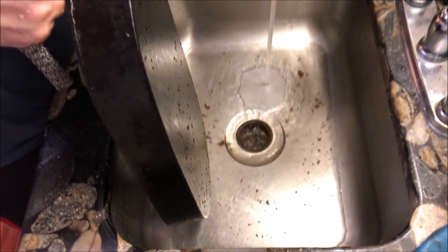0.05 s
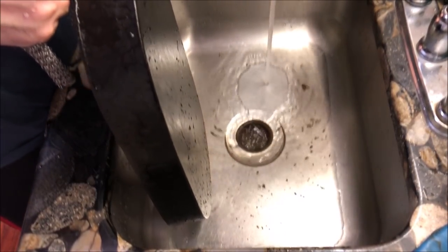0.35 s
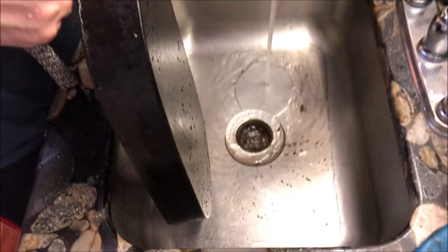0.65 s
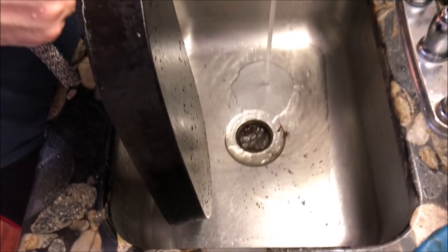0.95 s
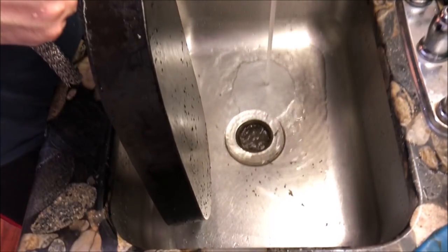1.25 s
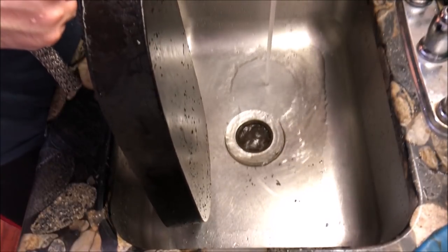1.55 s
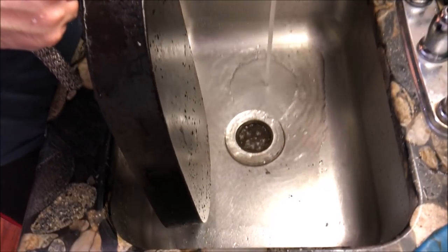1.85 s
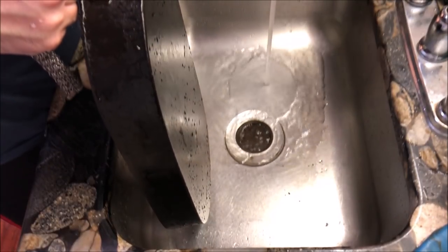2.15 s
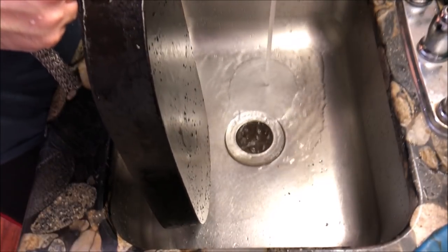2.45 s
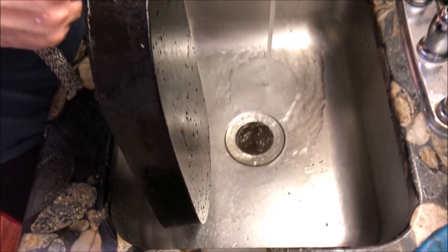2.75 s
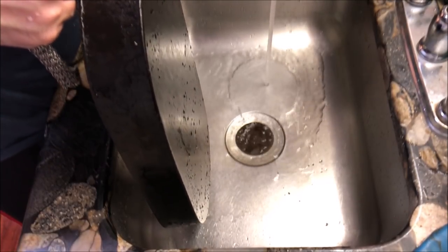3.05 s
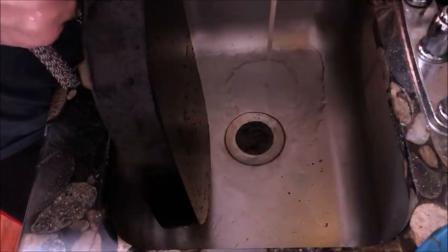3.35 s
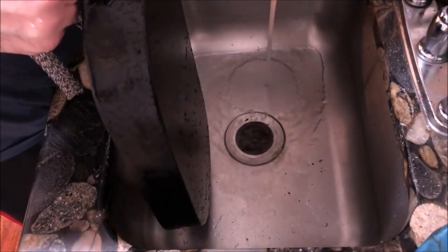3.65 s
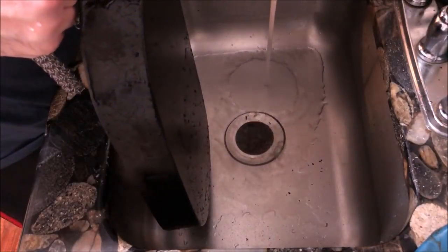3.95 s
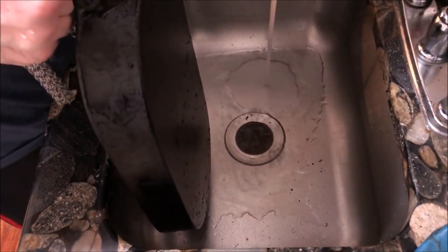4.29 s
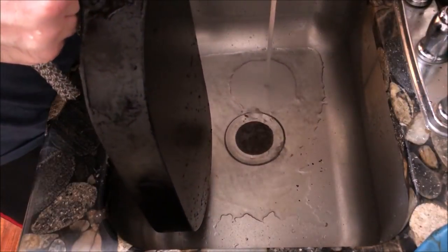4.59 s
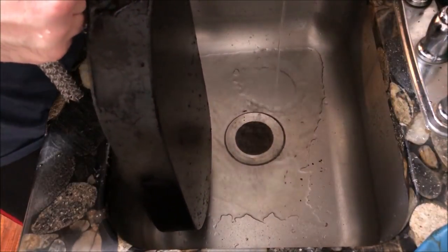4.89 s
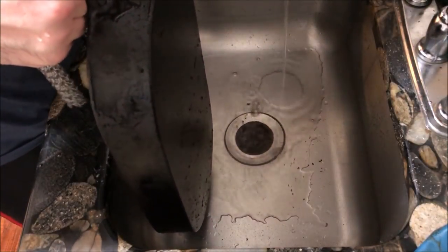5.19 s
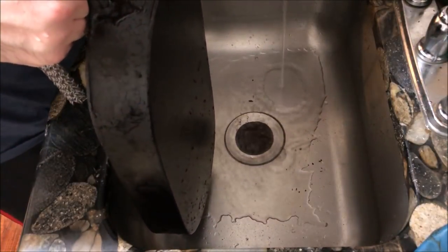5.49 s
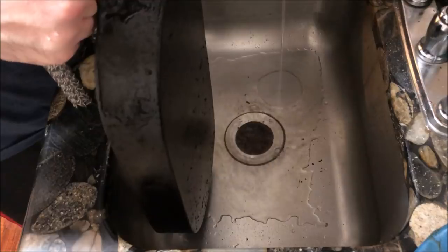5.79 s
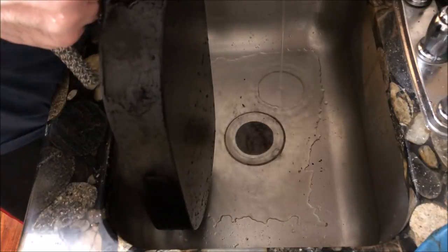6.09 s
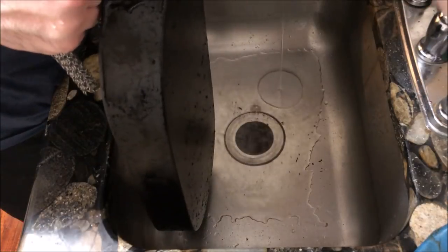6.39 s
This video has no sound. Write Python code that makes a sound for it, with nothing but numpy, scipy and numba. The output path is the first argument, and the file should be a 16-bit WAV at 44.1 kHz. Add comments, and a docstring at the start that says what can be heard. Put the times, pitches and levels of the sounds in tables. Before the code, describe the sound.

Tap water hisses into a steel sink over a low motor hum; the hum stops, then the water dwindles to a dribble and drips.

```python
"""A tap runs into a steel kitchen sink: the jet hisses and crackles with small bubbles, and a sheet
of water swishes across the basin. When the tap is closed, the last thread of water breaks into
drops that drum on the steel. Something bumps the sink twice. Behind the water, a mains motor hums
until it is switched off, a little before the tap closes."""
import sys
import numpy as np
from scipy import signal
from scipy.fft import rfft, irfft
from scipy.io import wavfile
from numba import njit

SR = 44100
rng = np.random.default_rng(int(sys.argv[2]) if len(sys.argv) > 2 else 0)


def persist_wave(psi):
    """Save psi, clipped to +-1, as 16-bit WAV."""
    counts = np.round(np.clip(psi, -1, 1) * 32767).astype(np.int16)
    wavfile.write(sys.argv[1], SR, np.atleast_2d(counts).T)


N = 283563
T = np.arange(N) / SR
# Levels in tables are relative. A "t60" is the time a sound takes to fade by 60 dB.

# The splashing sounds a little louder near the end.
JET_DB, LOUDER_DB, LOUDER_FROM_S, LOUDER_RISE_S = -38.5, 2.5, 3.68, 0.37
# The tone of the splashing jet: f/Hz, level/dB
JET_TONE = [(30, -33), (300, -6), (700, -15), (950, -18), (1100, -16), (2100, -14.5), (2900, -10),
            (3500, -12), (3950, -1.5), (5000, -8), (5900, -2.5), (7500, -7.5), (9800, -5.5), (12000, -3.5),
            (16000, -4)]
def jet(strength):
    """A fine hiss, the clicks of bursting foam and short bubble rings, all swelling with the splash."""
    hiss = level(rng.standard_normal(N), -22.5)
    clicks = level(impacts(1500, 12.6, 34), -1)
    fine = level(foam(count=4000, low_hz=5940, high_hz=18000, cycles=19.5, spread_db=3), 0)
    coarse = level(foam(count=2600, low_hz=2790, high_hz=8200, cycles=8, spread_db=11), -1.5)
    water = colour(hiss + clicks + fine + coarse, JET_TONE)
    flutter_db = 1.4 * wander(80)
    return level(water, 4.6) * strength * undb(flutter_db)


def foam(count, low_hz, high_hz, cycles, spread_db):
    """Many small bubbles, each with its own moment, pitch and loudness."""
    out = np.zeros(N)
    for when, pitch, size in rng.random((count, 3)):
        size_db = min(-spread_db * np.log(1 - size), 14)
        hz = low_hz * (high_hz / low_hz) ** pitch
        add(out, when * N / SR, undb(size_db) * bubble(hz, cycles))
    return out


def bubble(hz, cycles, rise=0.029):
    """A bubble rings for some cycles, rising in pitch as it nears the surface."""
    t60 = cycles / hz
    t = T[:int(t60 * SR) + 2]
    return np.sin(2 * np.pi * hz * t * (1 + rise * t / t60)) * fade(t, t60)


TAP_CLOSED_S, DRIBBLE_FROM_S, DRIBBLE_TO_S, DRIBBLE_BUILD_DB_PER_S = 4.915, 5.14, 5.76, 5.5
def flow():
    """Strength of the full jet and of the dribble that builds up after it, each from 0 to 1."""
    running = fade(np.maximum(T - TAP_CLOSED_S, 0), t60=0.32)
    build_db = DRIBBLE_BUILD_DB_PER_S * np.minimum(T - DRIBBLE_TO_S, 0)
    dribble = undb(build_db) * envelope(DRIBBLE_FROM_S, rise=0.031, stop=DRIBBLE_TO_S, t60=1)
    return running, dribble


# The loudest bubbles bursting under the jet: t/s, snap level/dB, ring level/dB, f/Hz
LOUD_POPS = [(0.8225, -15, -28, 4040), (1.2374, -17, -27, 5670), (1.3029, -10, -27, 8280),
             (1.716, -15, -29, 6100), (1.9704, -13, -26, 6120), (2.3351, -18, -28, 4040),
             (2.364, -16, -27, 4050), (3.0445, -14, -30, 5710), (3.6696, -16, -29, 4250),
             (3.9165, -16, -24, 5910), (4.0622, -11, -21, 6040), (4.3031, -14, -22, 5410),
             (4.3425, -12, -23, 4430), (4.5067, -11, -23, 6660), (4.6379, -8, -28, 8080),
             (4.7626, -12, -21, 5620), (4.8115, -13, -26, 8000), (4.8514, -12, -25, 6730),
             (4.9053, -9, -25, 5740), (4.9282, -9, -24, 5730)]
def pops(jet_db):
    """Larger bubbles burst where the jet lands, each with a ring, a little spray and a snap."""
    out = np.zeros(N)
    for s, snap_db, ring_db, hz in list(LOUD_POPS) + lesser_pops(jet_db, count=110):
        add(out, s, undb(ring_db + 12.5) * bubble(hz, cycles=18))
        add(out, s, undb(snap_db - 2) * burst(t60=0.0054))
        add(out, s, undb(snap_db) * bubble(12000, cycles=5))
    return colour(out, [(800, -28), (2300, -18), (3400, 0), (16000, 0)])


def lesser_pops(jet_db, count, from_s=0.71, low_hz=3540, high_hz=6080):
    """Once water covers the sink floor, mostly weak pops come at random until the tap is closed."""
    when, size, pitch = rng.random((count, 3)).T
    s = from_s + when * (TAP_CLOSED_S - from_s)
    snap_db = np.interp(s, T, jet_db) + 10 + 10 * size ** 2
    ring_db = snap_db - 8.5
    hz = low_hz * (high_hz / low_hz) ** pitch
    return list(zip(s, snap_db, ring_db, hz))


SPURT_HZ, SHEET_START_HZ, SHEET_HALF_PITCH_S = 10700, 13350, 0.18
# The spurts that start the sheet of water: t/s, level/dB
FIRST_SPURTS = [(0.021, -21), (0.087, -19)]
def swish():
    """Bright spurts, then a sheet of water fizzes over the steel, lower in pitch as it deepens."""
    spurts = sum(undb(db) * envelope(s, rise=0.013, stop=s + 0.011, t60=0.19) for s, db in FIRST_SPURTS)
    sheet = undb(-24.5) * envelope(0.09, rise=0.1, stop=0.19, t60=3.62)
    sheet_hz = SHEET_START_HZ / (1 + T / SHEET_HALF_PITCH_S)
    return spurts * fizz(np.full(N, float(SPURT_HZ))) + sheet * fizz(sheet_hz)


def fizz(hz):
    """Fine bubbles around one pitch; the commonest size stands out, and the steel favours some bands."""
    all_sizes = level(bandpass(impacts(8000, 3.4, 24), hz, 1.9) / np.sqrt(hz), 0)
    commonest = level(bandpass(impacts(9000, 3, 24), 0.87 * hz, 0.45) / np.sqrt(hz), -5)
    steel_tone = [(300, -13.5), (700, 8), (920, -9), (1100, -1), (1700, -2.5), (2500, 2),
                  (3400, -1.5), (4400, 3.5), (9000, -3), (16000, 2)]
    sound = colour(all_sizes + commonest, steel_tone)
    flutter_db = 1.1 * wander(40)
    return level(sound, 0) * undb(flutter_db)


# The tone of a drop spreading on steel: f/Hz, level/dB
SPLAT_TONE = [(400, -9), (750, -0.5), (920, -13.5), (1200, -4), (1450, -2), (2200, -5.5), (3500, -8.5),
              (7000, -22), (15000, -24)]
# The larger drops: t/s, tick level/dB, splat level/dB, trapped bubble f/Hz
LAST_DROPS = [(4.967, -38, -50, 1800), (5.162, -29, -43.5, 5250), (5.178, -25, -41, 6500),
              (5.217, -27, -38, 5650), (5.359, -38, -60, 6200), (5.444, -18, -36.5, 6800),
              (5.564, -26, -38, 6400), (5.591, -25, -28, 4300), (5.66, -42, -36, 4280),
              (5.678, -30, -33.5, 6400), (5.768, -41, -36, 5450), (6.118, -15, -68, 9000),
              (6.237, -32, -78, 9600), (6.259, -39, -80, 5120), (6.37, -32, -90, 7160)]
def drops():
    """Each drop ticks, spreads in a splat and pushes the sink floor; bigger splats thud harder."""
    ticks, splats, pushes = np.zeros((3, N))
    for s, tick_db, splat_db, _ in LAST_DROPS:
        add(ticks, s, undb(tick_db) * burst(t60=0.015))
        add(splats, s, undb(splat_db) * burst(t60=0.14))
        add(pushes, s, undb(-18.5 + 0.47 * splat_db) * fade(T[:256], t60=0.0021))
    ticks = colour(ticks, [(800, -36), (2500, -47), (5000, 1.5), (8000, 2.5), (16000, -1)])
    splashes = undb(-7) * ticks + undb(13.5) * colour(splats, SPLAT_TONE)
    thuds = undb(-23) * steel_ring(pushes)
    return splashes, thuds


# Lone bubbles in the draining water: t/s, level/dB, f/Hz
LONE_BUBBLES = [(5.256, -34.5, 5800), (5.811, -40, 5300)]
def plinks():
    """Bubbles ring longer in calm water than under the jet: each drop traps one, and a few ring alone."""
    trapped = [(s, -15.5 + 0.56 * tick_db, hz) for s, tick_db, _, hz in LAST_DROPS]
    out = np.zeros(N)
    for s, db, hz in trapped + list(LONE_BUBBLES):
        add(out, s, undb(db) * bubble(hz, cycles=90, rise=0.08))
    return out


def trickle(dribble):
    """The thin thread of water ticks faintly on the steel, and crackles while it dribbles."""
    crackle = level(colour(impacts(900, 3.7, 19), SPLAT_TONE), -53)
    tick_tone = [(800, 4), (3000, -3.5), (6000, -2), (16000, 0)]
    ticks = level(colour(impacts(200, 4, 11), tick_tone), -57.5)
    return crackle * dribble + ticks * (T > TAP_CLOSED_S)


def drumming(running, dribble):
    """The jet, the sheet of water and the dribble patter on the sink floor and keep it ringing low."""
    sheet = envelope(0, rise=0.19, stop=0.95, t60=1.6)
    force = np.maximum(undb(-43) * running, undb(-35) * sheet) + undb(-34) * dribble
    patter_tone = [(100, 11), (200, 9), (280, -16), (400, 5.5), (750, -7.5), (1300, -15), (2500, -9.5)]
    patter = colour(impacts(500, 3.9, 34), patter_tone)
    return undb(-3) * steel_ring(patter * force) / np.std(steel_ring(patter))


# The notes that the steel basin rings with: f/Hz, level/dB, t60/s
STEEL_NOTES = [(133, -30, .25), (173.2, -5.5, 0.25), (213.5, -4, 0.186), (279.7, 4, 0.21), (281.7, -5, 0.4),
               (309, -11, 0.39), (322.4, -10, 0.62), (389, -5.5, 0.45), (445, -9.5, 0.33),
               (473.4, -16, 0.42), (587, -10, 0.26), (630, -4.5, 0.12), (723, -16, 0.43), (790, -5.5, 0.1),
               (985, -10, 0.074), (1415, -3, 0.24), (1506, -12, 0.47), (1620, -26, .22),
               (2140, -12.5, 0.25)]
def steel_ring(push):
    """The basin answers a push with its own notes; its thin walls give off no deep bass."""
    t = T[:SR]
    notes = sum(undb(db) * np.cos(2 * np.pi * hz * t) * fade(t, t60) for hz, db, t60 in STEEL_NOTES)
    wall_tone = [(60, -16.5), (170, -5.5), (330, 3), (390, -22), (480, -2), (2000, -5.5), (5000, -9.5)]
    return colour(through(push, notes), wall_tone)


# Bands that the steel walls favour in every splash: f/Hz, width as a share of f, level/dB
WALL_BANDS = [(1069, 0.015, 6), (1500, 0.016, -22), (4130, 0.025, -36), (4280, 0.017, -21),
              (5560, 0.11, -6.5), (6650, 0.021, -43), (8220, 0.064, -3), (11500, 0.09, -9)]
def basin(x):
    """The walls ring and add quick echoes that change with the spot hit; the kitchen echoes faintly."""
    x = x + sum(undb(db) * bandpass(x, np.full(N, float(hz)), float(width))
                for hz, width, db in WALL_BANDS)
    out = undb(-3) * x
    blend = np.pi * wander(60)  # drifts between two sets of echoes
    for share in (np.cos(blend), np.sin(blend)):
        walls = burst(t60=0.046) * (T[:8192] > 0.0008)
        out = out + undb(-4.5) * through(x * share, walls / np.linalg.norm(walls))
    kitchen = burst(t60=0.11, size=16384) * (T[:16384] > 0.006)
    return out + undb(-12) * through(x, kitchen / np.linalg.norm(kitchen))


# The tones of two dull bumps (the first has three): t/s, f/Hz, level/dB, t60/s
BUMP_TONES = [(4.36, 682, -32, 0.093), (4.364, 300, -17, 0.027), (4.378, 117, -22, 0.11),
              (4.733, 137, -33.5, 0.18)]
def bumps():
    """Soft knocks against the sink that die away quickly."""
    out, t = np.zeros(N), T[:SR // 2]
    soft_start = 1 - fade(t, 0.018)
    for s, hz, db, t60 in BUMP_TONES:
        add(out, s, undb(db + 5.5) * np.sin(2 * np.pi * hz * t) * fade(t, t60) * soft_start)
    return out


HUM_HZ, MOTOR_OFF_S, RUMBLE_SETTLE_DB_PER_S = 120, 3.418, 3
# The motor's rumble through the cabinet: f/Hz, level/dB
RUMBLE_TONE = [(20, -16.5), (55, -11), (110, 9), (180, 4), (280, -8), (400, -7), (520, -12), (660, -10),
               (900, -22.5), (1800, -20), (3000, -37)]
# The tones in the motor's hum: multiple of HUM_HZ, level/dB
HUM_TONES = [(1, -8.5), (2, -34), (3, -45.5), (4, -47), (5, -45.5), (6, -55.5), (8, -62.5), (9, -64.5),
             (11, -53.5), (12, -59.5), (13, -56), (14, -54), (15, -51.5), (17, -57), (18, -60.5)]
def motor():
    """A magnetic hum at twice the mains rate, over a rumble that slowly settles."""
    since_off = np.maximum(T - MOTOR_OFF_S, 0)
    # switched off, the motor stops fast and the cabinet rings on briefly
    strength = 0.66 * fade(since_off, t60=0.073) + 0.31 * fade(since_off, t60=0.37)
    hum = 0
    for k, db in HUM_TONES:
        # the lowest tone is firm, the higher ones buzz unevenly
        waver_db = 0.12 * wander(9) if k == 1 else 1.2 * wander(7)
        tone = np.sqrt(2) * np.sin(2 * np.pi * (k * HUM_HZ * T + rng.random()))
        hum = hum + undb(db + waver_db) * tone
    rumble = level(colour(rng.standard_normal(N), RUMBLE_TONE), -31)
    return strength * (undb(-0.43) * hum + rumble * undb(-RUMBLE_SETTLE_DB_PER_S * T))


# The tone of the kitchen's background: f/Hz, level/dB
ROOM_TONE = [(20, -39), (60, -10.5), (120, -10.5), (178, 3.5), (245, -16.5), (410, -26.5), (650, -14.5),
             (860, -28.5), (1250, -42.5), (1460, -31), (1800, -30), (2120, -25), (2700, -56), (5200, -30),
             (7000, -40), (15000, -47.5)]
def room():
    """The kitchen's faint, steady noise."""
    return level(colour(rng.standard_normal(N), ROOM_TONE), -50)


def undb(db):
    """Turn decibels into a volume factor."""
    return 10 ** (np.asarray(db) / 20)


def level(x, db):
    """Scale a sound to an average (rms) level."""
    return x * undb(db) / np.sqrt(np.mean(x ** 2))


def fade(t, t60):
    """Die away, 60 dB down after t60."""
    return np.exp(-np.log(1000) * t / t60)


def envelope(start, rise, stop, t60):
    """Rise from start, hold until stop, then die away; all in seconds."""
    return np.clip((T - start) / rise, 0, 1) * fade(np.maximum(T - stop, 0), t60)


def wander(rate):
    """Glide between random values, roughly -1 to 1, rate times a second."""
    steps = rng.standard_normal(8192)
    return np.interp(T * rate, np.arange(len(steps)), steps)


def impacts(rate, spread_db, cap_db):
    """Tiny random hits, about rate a second, most weak and a few strong."""
    hit = rng.random(N) < rate / SR
    size_db = cap_db * np.tanh(spread_db * rng.exponential(size=N) / cap_db)
    return hit * undb(size_db) * rng.choice([-1, 1], N)


def burst(t60, size=8192):
    """A dying puff of noise."""
    return rng.standard_normal(size) * fade(T[:size], t60)


def add(track, s, sound):
    """Mix a sound in at s seconds."""
    i = max(int(s * SR), 0)
    track[i:i + len(sound)] += sound[:max(N - i, 0)]


def through(x, response):
    """Pass a sound through something, given its response to one click."""
    return signal.oaconvolve(x, response)[:len(x)]


def colour(x, points, size=2048):
    """Shape a sound's tone along (f/Hz, level/dB) points."""
    hz, db = np.transpose(points)
    bins = np.maximum(np.fft.rfftfreq(size, 1 / SR), 1)
    gain = undb(np.interp(np.log(bins), np.log(hz), db))
    cepstrum = irfft(np.log(gain))
    # fold it so that the filter never rings before the sound arrives
    cepstrum[1:size // 2] *= 2
    cepstrum[size // 2 + 1:] = 0
    return through(x, irfft(np.exp(rfft(cepstrum))))


@njit
def bandpass(x, hz, width):
    """Keep a band around a pitch that may move; width is a share of that pitch."""
    out, band_state, low_state = np.empty(len(x)), 0., 0.
    for i in range(len(x)):
        tuning = np.tan(np.pi * hz[i] / SR)
        band = (band_state + tuning * (x[i] - low_state)) / (1 + tuning * (tuning + width))
        band_state = 2 * band - band_state
        low_state += 2 * tuning * band
        out[i] = width * band
    return out


def scene():
    """Water in the basin, the ringing steel, the motor and the kitchen, in one channel."""
    running, dribble = flow()
    jet_db = JET_DB + LOUDER_DB * np.clip((T - LOUDER_FROM_S) / LOUDER_RISE_S, 0, 1)
    spray = undb(jet_db) * running + undb(-71) * dribble
    splashes, thuds = drops()
    water = basin(jet(spray) + swish() + pops(jet_db) + splashes + trickle(dribble) + plinks())
    background = room()
    return (water + thuds + drumming(running, dribble) + bumps() + motor() + background)[None]


def record(dry, top_hz=16000):
    """Cut away the very highest treble."""
    return signal.sosfilt(signal.ellip(10, 0.2, 70, top_hz, fs=SR, output="sos"), dry)


dry = scene()
out = record(dry)
persist_wave(out)
```